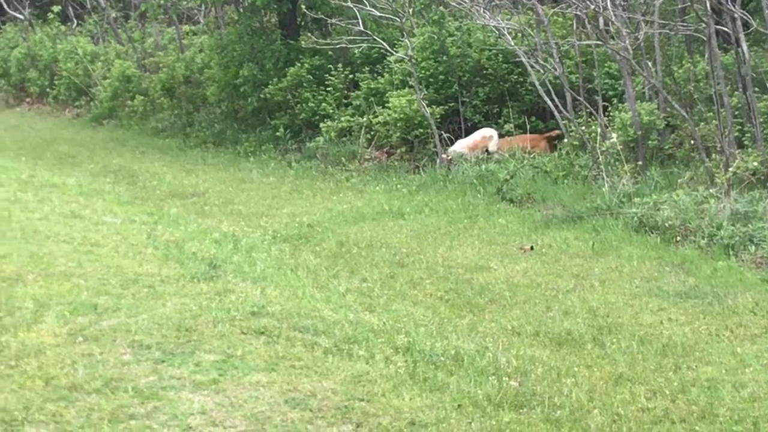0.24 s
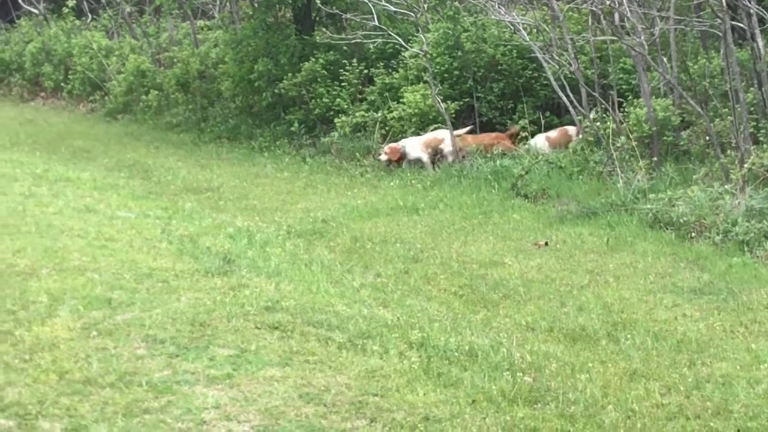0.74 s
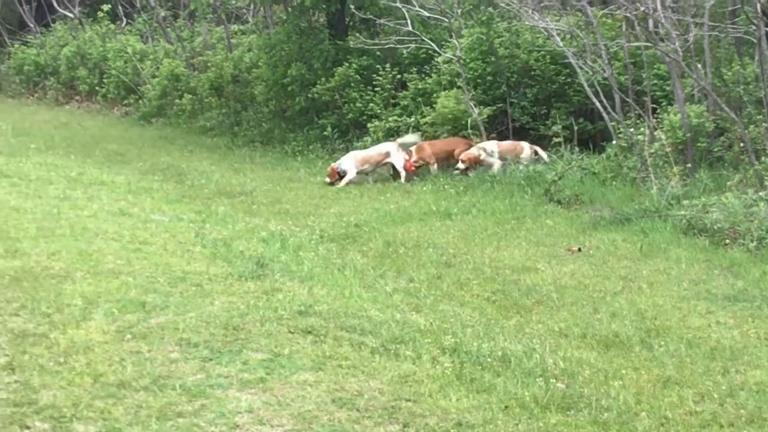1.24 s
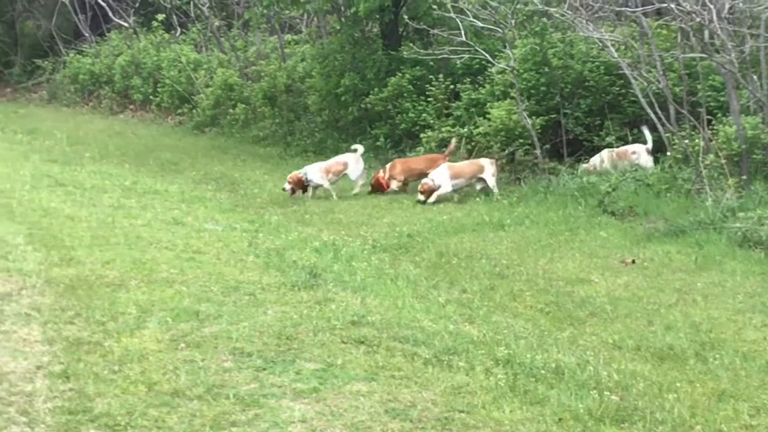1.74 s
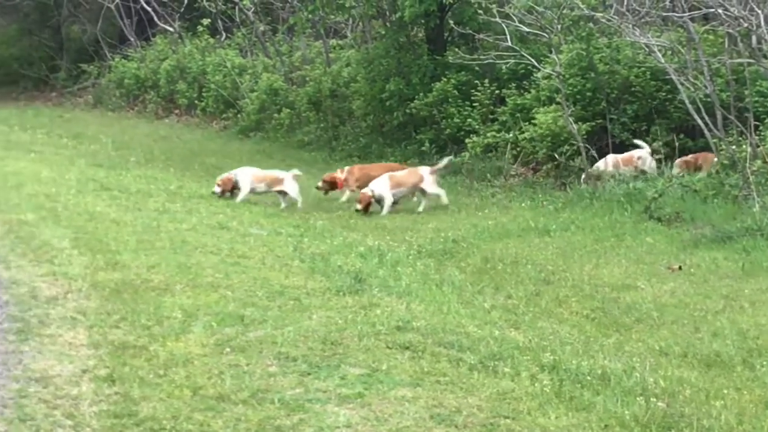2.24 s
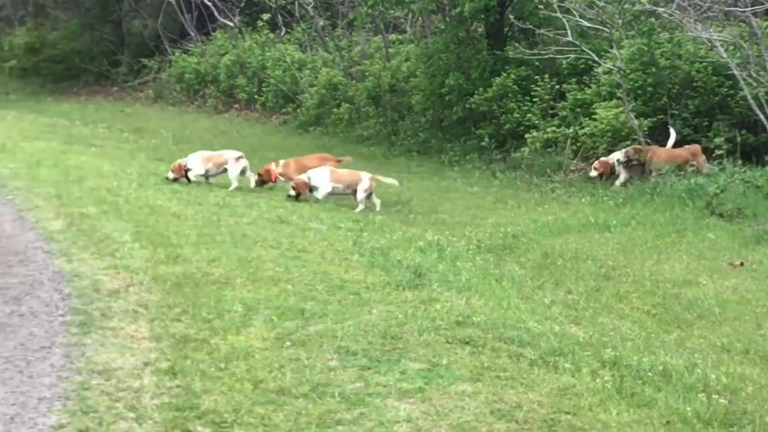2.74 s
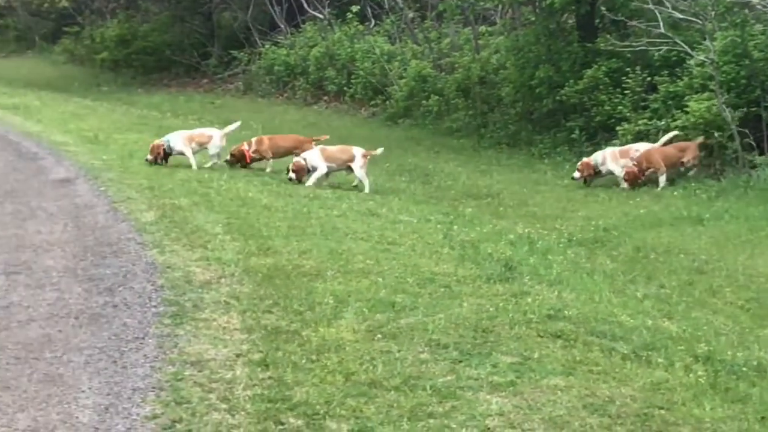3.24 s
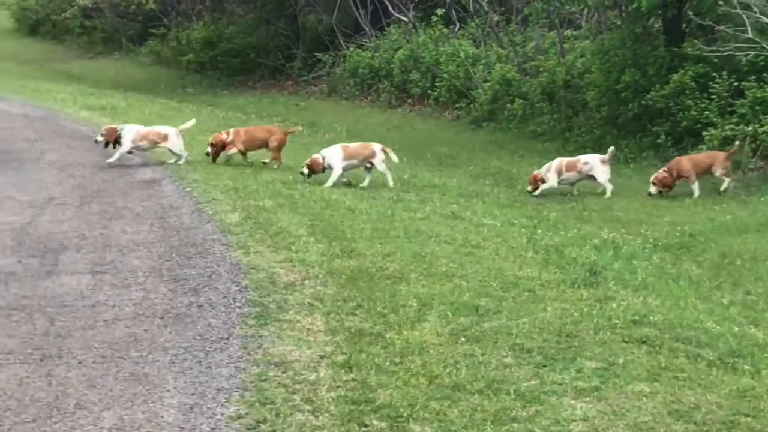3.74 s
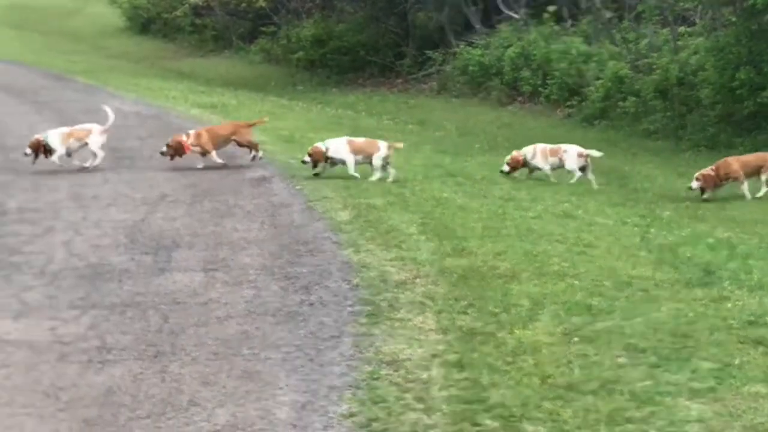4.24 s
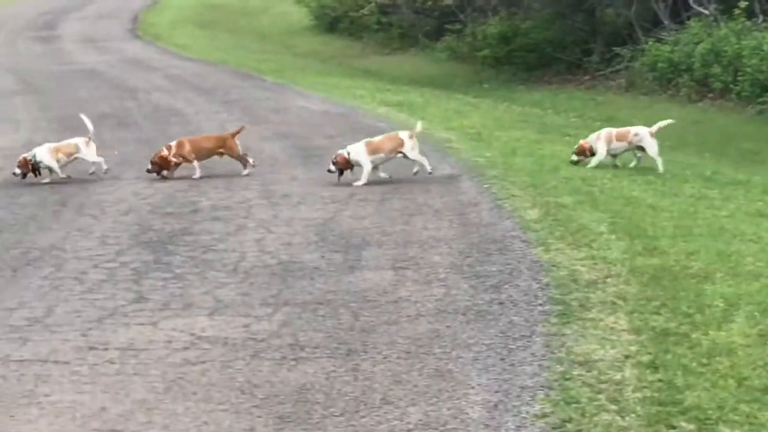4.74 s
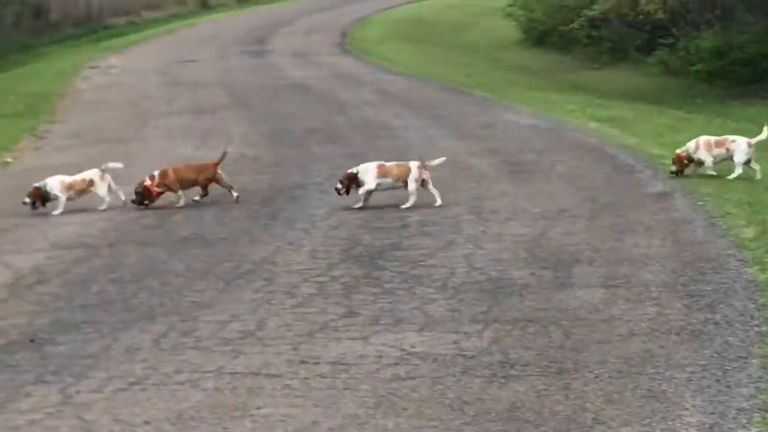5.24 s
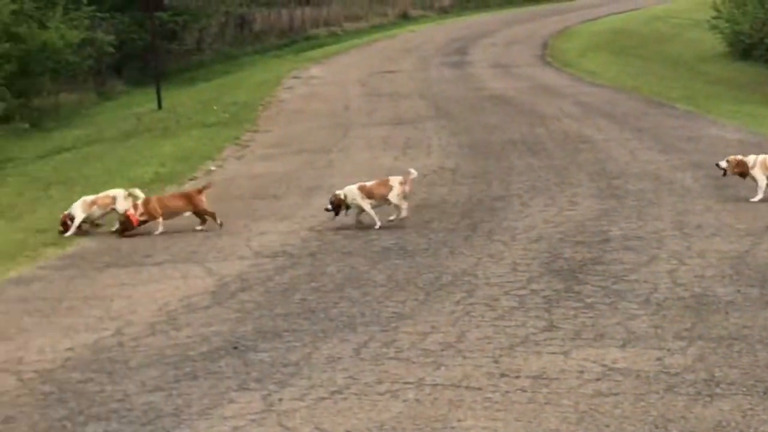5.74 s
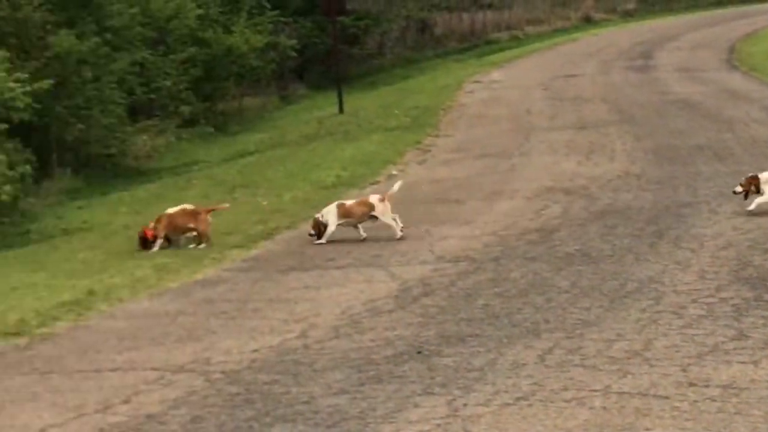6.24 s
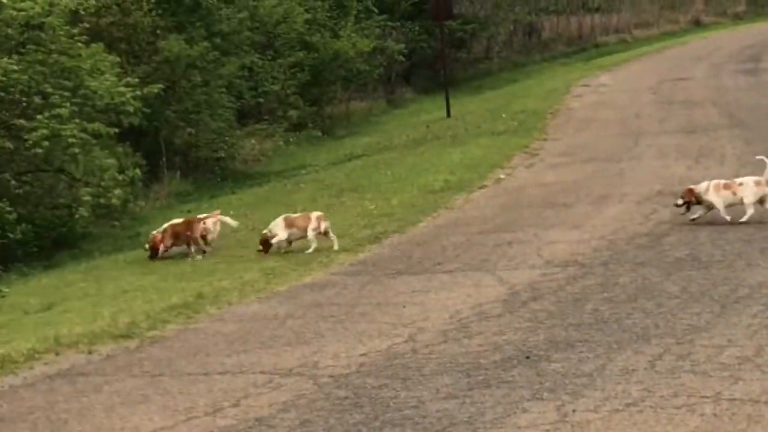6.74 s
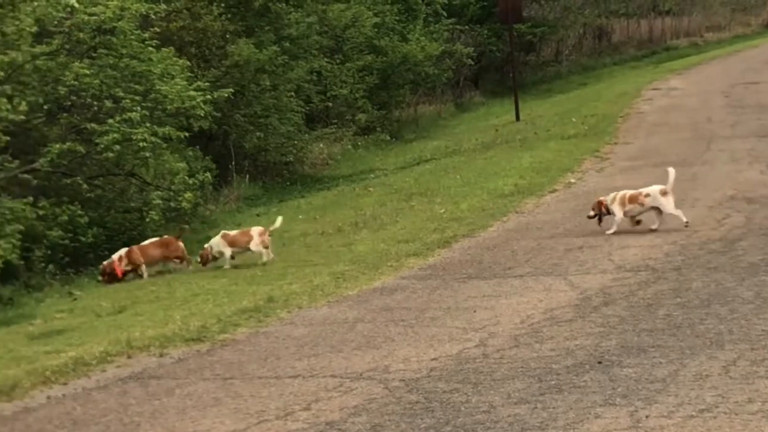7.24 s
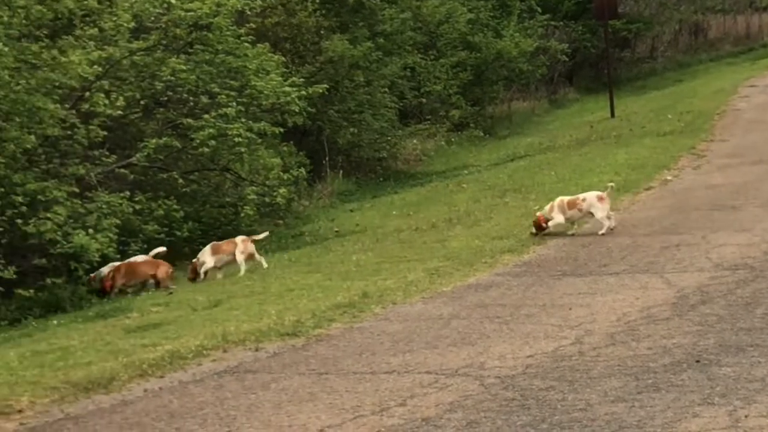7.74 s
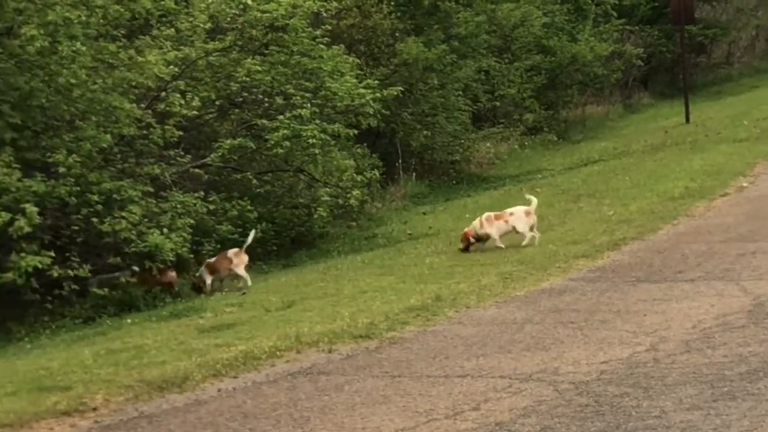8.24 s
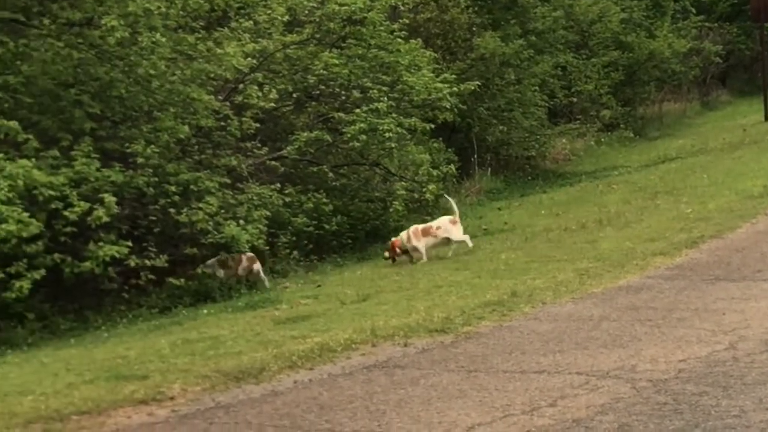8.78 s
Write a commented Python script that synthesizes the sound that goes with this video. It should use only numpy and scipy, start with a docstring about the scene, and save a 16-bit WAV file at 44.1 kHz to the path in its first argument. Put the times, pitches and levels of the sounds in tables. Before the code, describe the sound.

A single handheld microphone picks up low, tearing wind and a few knocks at the start, nearly covering faint hound yelps. The wind drops to a gusty breeze with soft thumps. The pack's clipped, sliding yelps become louder and crowded, mixed with rough barks, then stop for about a second around six before starting again. Trees return a faint, diffuse echo over quiet hiss.

```python
"""A pack of beagles trails a scent, with overlapping yelps, squeaks and hoarse barks; the wood's edge answers.
In the first second wind buffets the one microphone hardest, over soft yelps and taps on the camera.
Then the wind eases to a gusty breeze with single puffs. From about 3.3 s the yelps are louder, and they
pause between 5.7 and 6.7 s; a last touch on the camera comes near 8.8 s. Yelps are sliding harmonics with a
closing jaw, barks slow pulses under a squeal, squeaks gliding tones, the rest shaped noise and pulses."""
import sys
import numpy as np
from scipy import signal
from scipy.fft import rfft, irfft, next_fast_len
from scipy.io import wavfile
from scipy.ndimage import uniform_filter1d, map_coordinates

SR = 44100
rng = np.random.default_rng(int(sys.argv[2]) if len(sys.argv) > 2 else 0)


def generate_wav(sig):
    """Save sig (samples, or channels by samples) to the path in sys.argv[1] as 16-bit PCM at SR."""
    pcm = np.round(np.clip(np.atleast_2d(sig).T, -1, 1) * 32767).astype(np.int16)
    wavfile.write(sys.argv[1], SR, pcm)


N = 397341

# throat colour, for barks and all breath: freq_hz, relative_db
THROAT = [(390, -46.5), (520, 2), (800, 2.5), (1100, 3), (1500, -4), (1900, -19), (2250, -15.5),
          (2900, -33.5), (4200, -56.5)]


def amp(db):
    """Decibels to gain."""
    return 10 ** (np.asarray(db) / 20)


def unit(x):
    """x at rms 1."""
    return x / np.sqrt(np.mean(x ** 2) + 1e-20)


def along(points, hz):
    """(Hz, value) points interpolated on a log frequency axis."""
    f, v = np.transpose(points)
    return np.interp(np.log(hz + 1), np.log(f + 1), v)


def wobble(rate_hz, size):
    """Smooth random curve with rate_hz knots a second."""
    knots = rng.standard_normal(int(size * rate_hz / SR) + 4)
    return map_coordinates(knots, [np.arange(size) * rate_hz / SR])


def filtered(x, response):
    """x through a gain that is a function of frequency."""
    m = next_fast_len(len(x) + 8192)
    return irfft(rfft(x, m) * response(np.fft.rfftfreq(m, 1 / SR)), m)[:len(x)]


def noise(spectrum):
    """Noise of rms 1 coloured by (Hz, dB) points."""
    return unit(filtered(rng.standard_normal(N), lambda hz: amp(along(spectrum, hz))))


def add(track, s, sound):
    """Mix a sound into the track at s seconds."""
    part = track[max(round(s * SR), 0):][:len(sound)]
    part += sound[:len(part)]


def gate(t, start_s, end_s, edge_s):
    """Opens around start_s and closes around end_s, each over edge_s."""
    ramp = np.minimum(t - start_s, end_s - t) / edge_s + .5
    return np.sin(np.pi / 2 * np.clip(ramp, 0, 1)) ** 2


def phase_of(hz):
    """Phase in radians of a varying frequency."""
    return 2 * np.pi * np.cumsum(hz) / SR


def span(s, length_s, edge_s):
    """Times since a call's start, share of it that has passed, opening and closing gain."""
    t = np.arange(-edge_s, length_s + edge_s, 1 / SR)
    t = t[s + t >= 0]
    return t, np.clip(t / length_s, 0, 1), gate(t, 0, length_s, edge_s)


def breath_puffs(breath, s, t, phase):
    """Breath noise let through once a cycle of the voice."""
    return np.interp(s + t, np.arange(N) / SR, breath) * (1 + np.cos(phase))


def pack():
    """Yelps, barks and squeaks; sound skimming the soft ground loses its low end."""
    # clear yelps: start_s, length_s, first_pitch_hz, held_pitch_hz, slide_share, base_level_db,
    # jaw_open_share, second_harmonic_db, upper_harmonics_db (both over base), voice_break_semitones, swell_db
    yelps = [(-0.002, 0.075, 577, 756, 0.16, -47.5, 0.14, 3, -12, 1, -4),
             (0.122, 0.11, 540, 638, 0.54, -39.5, 0.87, -13.5, -31, 0.0, 2),
             (0.243, 0.11, 595, 622, 0.93, -51.0, 0.52, -2.5, -20, 2, -1),
             (0.344, 0.139, 667, 778, 0.97, -48.5, 0.56, 4, -11, 0.9, 7),
             (0.629, 0.081, 654, 772, 0.2, -42.5, 0.086, -2, -12.5, 0.0, -8),
             (0.728, 0.16, 598, 774, 0.59, -46, 0.56, -5, -18, 0.4, -0.5),
             (0.948, 0.13, 546, 656, 0.45, -43.5, 0.81, -18, -53, 0.0, 15),
             (1.143, 0.152, 602, 732, 0.19, -43.5, 0.34, -12, -19.5, 1.3, 6),
             (1.251, 0.126, 537, 633, 0.62, -39, 0.27, -11.5, -28, 0.6, -2),
             (1.581, 0.11, 816, 715, 0.63, -45.5, 0.14, -4, -14.5, 3.5, -10.5),
             (1.659, 0.15, 501, 674, 0.42, -40, 0.08, -6, -22, 0.0, 0.5),
             (1.738, 0.17, 586, 717, 0.36, -48, 0.39, -5.5, -17.5, 1.1, 6),
             (1.965, 0.11, 623, 777, 0.17, -51.5, 0.29, -5.5, -13, 2, -12),
             (1.999, 0.12, 543, 633, 0.68, -39, 0.16, -8, -23, 0.0, 2.5),
             (2.12, 0.17, 578, 729, 0.31, -47, 0.27, -8, -17, 2.2, -2),
             (2.313, 0.15, 566, 650, 0.31, -39, 0.38, -17.5, -31.5, 1.8, -9),
             (2.652, 0.12, 540, 643, 0.19, -36.5, 0.49, -19, -32.5, 2.0, 1),
             (2.956, 0.16, 557, 739, 0.45, -39.5, 0.44, -4.5, -14.5, 1.56, 1.5),
             (3.306, 0.1, 557, 641, 0.5, -32.5, 0.4, -23, -33, 0.7, 0),
             (3.389, 0.11, 710, 608.7, 0.41, -38.5, 0.23, -1, -26, 0.5, -0.5),
             (3.624, 0.14, 423.5, 657, 0.15, -33, 0.41, -15, -40, 2.0, 3),
             (3.764, 0.16, 538, 682, 1.0, -43.5, 0.25, -14.5, -40, -0.5, -19),
             (3.893, 0.1, 562, 746, 0.89, -38.7, 0.27, -3.5, -29, 2.5, -6.5),
             (3.922, 0.13, 852, 758, 0.46, -36.5, 0.14, 0.5, -46.5, 2, 1),
             (3.96, 0.15, 525.5, 713, 0.73, -31.5, 0.38, -9.5, -28.5, 0.2, 5.5),
             (4.152, 0.17, 544, 687, 0.95, -40, 0.26, -14.5, -44, 1.4, -21),
             (4.234, 0.079, 462, 657, 0.54, -51.5, 0.34, 8, -26, 2, 2),
             (4.303, 0.158, 472.5, 673.5, 0.24, -29, 0.38, -10.5, -24, 2.0, 1.5),
             (4.39, 0.098, 767, 725, 0.79, -38.5, 0.11, -14, -35, -0.5, -4),
             (4.536, 0.07, 472.4, 591, 0.41, -39.5, 0.88, 2.5, -19, 0.65, -6),
             (4.568, 0.14, 562, 644.4, 0.68, -33, 0.81, -19.5, -55, 0.0, -12),
             (4.711, 0.16, 508, 713, 0.45, -39.5, 0.39, -13, -48, 1.2, -1.5),
             (4.852, 0.16, 488.5, 676.6, 0.24, -28.5, 0.4, -15, -27, 2.5, 3.5),
             (5.13, 0.128, 584, 720, 0.64, -39.5, 0.071, -2, -21.5, 1.5, 0),
             (5.161, 0.16, 528.4, 663, 0.98, -30, 0.905, -13.5, -27, 1.53, 11),
             (5.459, 0.198, 436.2, 713, 0.52, -33, 0.43, -18, -33.5, 1.0, -3),
             (6.69, 0.16, 604.6, 733.4, 0.51, -29.3, 0.85, -11, -38.5, 0.13, 0.5),
             (6.775, 0.106, 597.4, 668, 0.97, -33, 0.1, -8.5, -31, -0.5, -5),
             (6.776, 0.13, 839, 777, 0.41, -37, 0.08, -28.5, -48, 0.6, 1),
             (7.064, 0.17, 489.5, 696.5, 0.22, -28, 0.34, -9, -33, 1.73, 0.5),
             (7.297, 0.16, 532, 708, 0.9, -34, 0.71, -15, -54.5, 2.33, 1.5),
             (7.428, 0.12, 538.5, 650, 0.8, -34, 0.24, -9, -32.5, -0.5, 5),
             (7.496, 0.17, 512, 791, 0.84, -32, 0.52, -3.5, -31, 0.5, 8),
             (7.677, 0.19, 533.4, 613, 0.26, -36, 0.3, -8.5, -32.5, 1.25, -2),
             (7.898, 0.16, 532, 763, 0.67, -33, 0.72, -7, -30.5, 0.4, 0.5),
             (8.13, 0.13, 815, 768, 0.27, -44, 0.076, -8, -30, 3.5, -9),
             (8.223, 0.14, 528.6, 638.6, 0.77, -41.5, 0.1, -10, -34, 1, -3),
             (8.281, 0.17, 537.6, 762.5, 0.47, -33, 0.55, -7.5, -29, 1.27, 0.5),
             (8.418, 0.152, 543, 681, 1.0, -37.7, 0.7, -17, -52, 1.6, -16),
             (8.557, 0.122, 800, 735, 0.57, -48, 0.12, -21, -18, 1, -7),
             (8.552, 0.16, 616, 595.5, 1.0, -40, 0.48, -15, -40, 2.6, -1.5),
             (8.783, 0.18, 580, 592, 0.73, -41.5, 0.33, -22, -41, 2.0, -8),
             (8.88, 0.19, 556, 751, 0.32, -30, 0.4, -6, -29.5, 1.65, 7)]
    # hoarse barks: start_s, length_s, pulse_rate_hz, first_jaw_resonance_hz, last_jaw_resonance_hz,
    # level_at_swell_top_db, swell_share, brightness_db_per_octave
    barks = [(0.314, 0.16, 261, 1063, 570, -53.5, .08, 6), (2.96, 0.17, 263.3, 813, 547, -40, 0.55, 2),
             (3.918, 0.1, 248.8, 890, 675, -41.5, .29, 1.5), (4.267, .14, 262.5, 659, 581, -46, 0.22, -3),
             (4.378, 0.054, 336, 1143, 990, -44.5, .17, 0.5),
             (4.606, 0.14, 259.7, 727, 521, -42, 0.35, -3.5),
             (4.914, 0.069, 333.2, 1261, 1330, -48.5, .28, 0), (5.13, 0.12, 256, 707, 528, -44, 0.56, -3),
             (5.464, .128, 249.4, 946, 476, -38, .29, 1), (5.815, .14, 251, 1034, 447, -36.5, 0.31, -0.5),
             (6.744, 0.043, 256, 982, 1020, -51.5, 0.76, -3),
             (7.717, 0.14, 266.4, 1070, 516.4, -37, 0.47, 3),
             (8.936, 0.067, 273.4, 1010, 566, -43, 0.79, 0)]
    # squeaks: start_s, length_s, mid_pitch_hz, glide_octaves, level_db
    squeaks = [(0.72, 0.061, 1047, -0.13, -55.5), (1.561, 0.03, 1097, 0.22, -53),
               (2.3, 0.026, 872, -0.16, -51), (2.633, 0.029, 866, -0.095, -50),
               (3.286, 0.019, 870, -0.093, -51.5), (3.618, 0.017, 898, 0.066, -45.5),
               (3.904, 0.028, 1140, -0.06, -38), (5.464, 0.0091, 912, 0.064, -41),
               (5.813, 0.016, 977, 0.029, -37.5), (7.71, 0.016, 1065, 0.21, -35.5)]
    dogs, rasp = np.zeros(N), noise(THROAT)
    for row in yelps:
        add(dogs, *yelp(row, amp(-26.5) * rasp, jitter=0.0097, waver=.004,
                        shimmer_db=2.46, upper_shimmer_db=3.5, edge_s=.012))
    for row in barks:
        add(dogs, *bark(row, amp(-10.0) * rasp, jitter=.025, shimmer_db=5.5,
                        squeal_db=4.5, closing_db=13.5, edge_s=.011))
    for row in squeaks:
        add(dogs, *squeak(row))
    return filtered(dogs, lambda hz: 1 / np.sqrt(1 + (440 / (hz + 1)) ** 20))


def yelp(row, breath, jitter, waver, shimmer_db, upper_shimmer_db, edge_s):
    """Five harmonics slide to a held note and drop, while the closing jaw mutes the overtones."""
    # colour of the two lowest harmonics: freq_hz, gain_db
    lower = [(480, -13.5), (580, -2), (680, -0.27), (780, 2.1), (900, 6.5), (1100, 0.1), (1300, -1.5),
             (1450, -2.5), (1600, -11)]
    # colour of the upper harmonics: freq_hz, gain_db
    upper = [(1750, 5), (2050, -1.5), (2350, 0.3), (2700, -9), (3100, -17.5), (3600, -35.5)]
    slide_ease = 1.64  # power flattening the slide into the held note
    sag_octaves_per_s = .12
    drop_octaves, drop_s, drop_s_per_octave = .55, .003, .013  # air runs out; a longer climb falls slower
    attack_db, attack_s = 12.5, .022  # pressure builds
    release_db, release_s = 14.5, .022  # pressure fails
    jaw_s, reopen_s = .0052, .009  # jaw closes and voice breaks; mouth slackens in the final drop
    shut_first_db, shut_second_db, shut_upper_db = 7.5, 9.0, 9.5  # lift of the first, muting of the rest

    (s, length_s, first_hz, held_hz, slide, base_db, jaw_open,
     second_db, upper_db, break_semitones, swell_db) = row
    t, u, opening = span(s, length_s, edge_s)
    since_s, left_s = u * length_s, (1 - u) * length_s
    shut = .5 + .5 * np.tanh((since_s - jaw_open * length_s) / jaw_s)

    # pitch, in octaves below the held note
    climb, leap = np.log2(held_hz / first_hz), break_semitones / 12
    below = (climb - leap) * np.maximum(1 - u / slide, 0) ** slide_ease + leap * (1 - shut)
    sag = sag_octaves_per_s * np.maximum(since_s - slide * length_s, 0)
    drop = drop_octaves * np.exp(-left_s / (drop_s + drop_s_per_octave * max(climb, 0)))
    pitch_hz = held_hz * 2 ** -(below + sag + drop)

    attack = attack_db * np.exp(-since_s / attack_s)
    release = release_db * np.exp(-left_s / release_s)
    effort_db = base_db + swell_db * (u - .5) - attack - release

    muted = shut * (1 - np.exp(-left_s / reopen_s))
    levels_db = [along(lower, pitch_hz) - shut_first_db * (1 - shut),
                 along(lower, 2 * pitch_hz) + second_db - shut_second_db * muted]
    levels_db += [along(upper, k * pitch_hz) + upper_db - shut_upper_db * muted for k in (3, 4, 5)]
    depths_db = [shimmer_db] * 2 + [upper_shimmer_db] * 3

    unsteady = 1 + jitter * wobble(129.6, len(t)) + waver * wobble(35, len(t))
    phase = phase_of(pitch_hz * unsteady)
    voice = sum(amp(level + depth * wobble(58.2, len(t))) * np.sin(k * phase)
                for k, (level, depth) in enumerate(zip(levels_db, depths_db), 1))
    air = breath_puffs(breath, s, t, phase) * amp((levels_db[0] + levels_db[1]) / 2)
    return s + t[0], opening * amp(effort_db) * (voice + air)


def bark(row, breath, jitter, shimmer_db, squeal_db, closing_db, edge_s):
    """Strained folds slap slowly and unevenly under a squeal; mouth resonance moves with the jaw."""
    swell_depth_db, sag_octaves = 12.5, .08  # swell top over both ends; slowing of the pulses
    shut_mouth_hz = 564  # mouth resonance falls no lower
    squeal_fade_db, breath_fade_db = 2.5, 5  # through one bark

    s, length_s, pulse_hz, first_hz, last_hz, top_db, swell, bright_db = row
    t, u, opening = span(s, length_s, edge_s)
    rate_hz = pulse_hz * 2 ** (sag_octaves * (.5 - u))
    jaw_hz = first_hz * (last_hz / first_hz) ** u
    mouth_hz = np.maximum(jaw_hz, shut_mouth_hz)
    level_db = top_db - swell_depth_db * np.interp(u, [0, swell, 1], [1, 0, 1])
    slack = np.minimum((265 / rate_hz) ** 5, 1)  # taut, fast folds beat more evenly
    phase = phase_of(rate_hz * (1 + jitter * slack * wobble(260, len(t))))

    # growl: harmonics 2 to 12 through throat and mouth
    k = np.arange(2, 13)[:, None]
    mouth = 1 + 2.7 / (1 + 1j * (k * rate_hz - mouth_hz) / 110)
    # a closing mouth lets less treble out
    tilt_db = (bright_db + closing_db * np.log2(jaw_hz / 750)) * np.log2(k / 2)
    gains = amp(along(THROAT, k * rate_hz) + tilt_db) * mouth
    gains = gains / np.linalg.norm(gains, axis=0)
    flutter = amp(shimmer_db * slack * np.array([wobble(93.7, len(t)) for _ in k]))
    growl = unit(np.sum(gains * flutter * np.exp(1j * k * phase), axis=0).real)

    # squeal: second, faster oscillation on the mouth resonance, shaken by the slaps
    shake = 1 + 0.057 * np.cos(phase)
    squeal = np.sin(phase_of(mouth_hz) + 0.24 * wobble(170, len(t))) * shake
    squeal = amp(squeal_db - squeal_fade_db * u) * squeal
    air = amp(-breath_fade_db * u) * breath_puffs(breath, s, t, phase)
    return s + t[0], amp(level_db) * opening * unit(growl + slack * (squeal + air))


def squeak(row):
    """Thin gliding whistle as a throat opens: a sine and a weak second harmonic."""
    s, length_s, hz, octaves, level_db = row
    t = np.arange(-SR // 100, (length_s + .01) * SR) / SR
    progress = t / length_s - .5
    phase = phase_of(hz * 2 ** (octaves * progress))
    swell = gate(t, 0, length_s, 0.0038) * amp(3 * progress)
    return s + t[0], amp(level_db) * swell * (np.sin(phase) + amp(-27.0) * np.sin(2 * phase))


def wood(x):
    """Trunks and leaves scatter a faint, late answer: a decaying noise tail with a soft onset."""
    # decay by frequency: freq_hz, t60_s
    decay = [(500, 0.84), (1400, 1.0), (3000, 0.36)]
    hz, t, z = signal.stft(rng.standard_normal(SR), SR, nperseg=256)
    fall = amp(-60 * t / along(decay, hz)[:, None])
    onset = 1 - np.exp(-t / 0.02)
    tail = signal.istft(z * fall * onset, SR, nperseg=256)[1]
    return signal.fftconvolve(x, tail / np.linalg.norm(tail))[:N]


def wind():
    """Slow buffets and small eddies share the gusts; only the strongest tear into a roar."""
    # strong opening gust, before layer gains: time_s, buffet_db, eddy_db
    opening_gust = [(0.0, -34, -35.5), (0.044, -25.5, -40.5), (0.098, -42.5, -47), (0.168, -33.5, -42),
                    (0.3, -36, -56.5), (0.376, -32, -35), (0.4, -28.5, -38), (0.476, -34, -42),
                    (0.862, -28, -27.5), (0.942, -33, -35.5), (0.968, -32.5, -27.5), (0.996, -22.5, -32.5),
                    (1.022, -39, -46), (1.072, -38, -36.5), (1.14, -54, -77)]
    # breeze after it, before layer gains: time_s, buffet_db, eddy_db
    breeze = [(1.2, -48.5, -68), (2.16, -60, -73), (2.46, -40, -73), (2.52, -40.5, -56.5),
              (3.16, -51.5, -66.5), (3.29, -40.5, -52.5), (3.48, -47.5, -51), (3.53, -52, -76),
              (3.72, -35.5, -49.5), (4.59, -58, -70), (4.87, -45, -71), (4.94, -55.5, -67.5),
              (5.81, -40.5, -61), (6.14, -54.5, -74), (6.68, -53, -75), (6.85, -39.5, -62),
              (7.01, -46, -76), (7.12, -32, -46), (7.16, -44.5, -63.5), (7.64, -44, -61.5),
              (7.73, -33, -43), (8.07, -55.5, -74), (8.62, -58, -68.5), (8.81, -59.5, -61),
              (8.97, -43.5, -69), (9.01, -48, -49)]
    # spectra of buffets, eddies and roar: freq_hz, relative_db_per_hz
    buffet_spectrum = [(15, -43), (28, -12), (43, 6), (70, 7), (110, -2.5), (170, -22), (260, -35.5),
                       (500, -81.5)]
    eddy_spectrum = [(60, -14.5), (150, 6), (220, -4.5), (320, -12.5), (480, -41), (1800, -83.5)]
    roar_spectrum = [(150, -19.5), (330, 14), (500, 0), (900, -15.5), (1600, -30), (3000, -57.5),
                     (6000, -110)]
    s, *columns = np.transpose(opening_gust + breeze)
    buffet_db, eddy_db = (np.interp(np.arange(N) / SR, s, c) for c in columns)
    buffet = amp(buffet_db + 0.68) * lumps(buffet_spectrum, rate_hz=24, depth_db=3.0)
    eddies = amp(eddy_db - 0.5) * lumps(eddy_spectrum, rate_hz=35, depth_db=5.5)
    # roar rises about twice as steeply as the eddies
    roar = amp(-45.0 + 2.05 * (eddy_db + 31.5)) * lumps(roar_spectrum, rate_hz=40, depth_db=2)
    return buffet + eddies + roar


def lumps(spectrum, rate_hz, depth_db):
    """Turbulence: noise in short puffs, its slow level evened out."""
    x = noise(spectrum) * amp(depth_db * wobble(rate_hz, N))
    slow_power = np.abs(uniform_filter1d(x ** 2, size=7500))
    return x / np.sqrt(slow_power + 1e-9)


def puffs():
    """Each puff pushes the diaphragm in and lets it swing back."""
    # single puffs against the microphone: centre_s, peak_db
    puff_rows = [(.38, -20.5), (2.54, -30), (3.885, -35.5), (3.943, -29.5), (4.838, -36.5), (5.427, -34.5),
                 (5.965, -34.5), (7.113, -32), (7.723, -24)]
    out, t = np.zeros(N), np.arange(-SR // 20, SR // 20) / SR
    u = t / 0.0028
    for s, peak_db in puff_rows:
        add(out, s + t[0], amp(peak_db) * (1 - 2 * u ** 2) * np.exp(-u ** 2))
    return out


def taps():
    """A hand knocks and brushes the camera body: decaying noise through a bell-shaped band."""
    # taps: start_s, peak_db, centre_hz, width_octaves, t60_s
    tap_rows = [(.376, -29.5, 300, 0.52, 0.055), (.407, -38.5, 2600, 0.7, 0.0088),
                (.821, -29, 450, 0.6, 0.022), (8.77, -44, 400, 0.47, 0.61)]
    out, t = np.zeros(N), np.arange(SR // 4) / SR
    for s, peak_db, hz, width, t60_s in tap_rows:
        burst = rng.standard_normal(len(t)) * amp(-60 * t / t60_s)
        padded = np.pad(burst, (SR // 100, 0))  # 10 ms lead for the filter's spread
        tap = filtered(padded, lambda f: np.exp(-.5 * (np.log2((f + 1) / hz) / width) ** 2))
        add(out, s - 1 / 100, amp(peak_db) * tap / np.abs(tap).max())
    return out


def still_air():
    """Steady noise of distant foliage and microphone hiss."""
    # spectrum: freq_hz, relative_db_per_hz
    air_spectrum = [(400, 12), (1300, 7), (2200, 1), (4200, -3), (9300, -8), (10500, -11.5), (11500, -7.5),
                    (15500, -11)]
    return amp(-69) * noise(air_spectrum)


def scene():
    """Dogs, their echo, wind, puffs, taps and the still air behind them."""
    dogs = pack()
    voices = amp(2.55) * dogs + amp(-20.5) * wood(dogs)
    return (voices + wind() + puffs() + taps() + still_air())[None]


def record(dry):
    """The camera keeps nothing above its band limit."""
    top_hz = 15750
    return np.array([filtered(channel, lambda hz: hz < top_hz) for channel in dry])


dry = scene()
out = record(dry)
generate_wav(out)
```